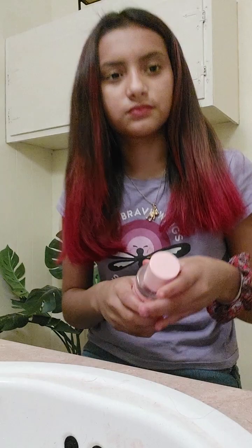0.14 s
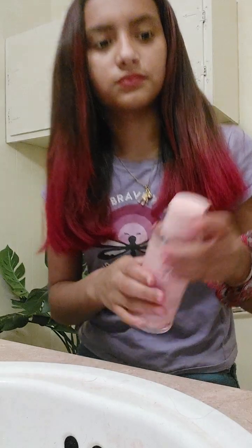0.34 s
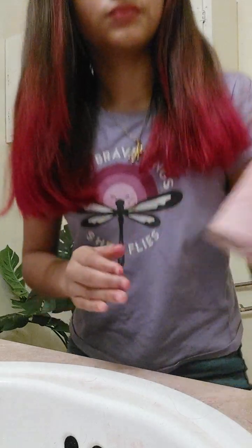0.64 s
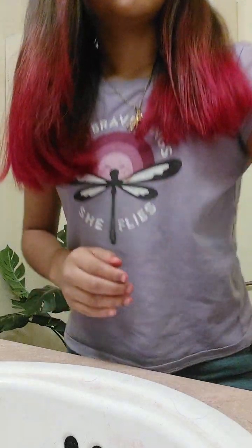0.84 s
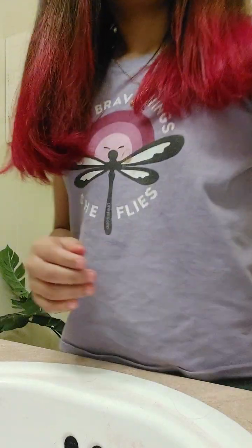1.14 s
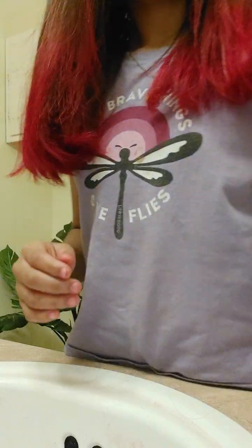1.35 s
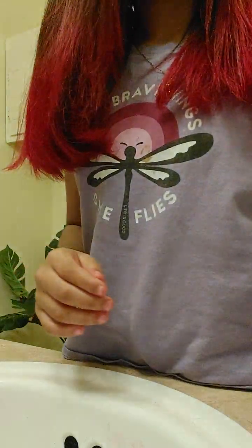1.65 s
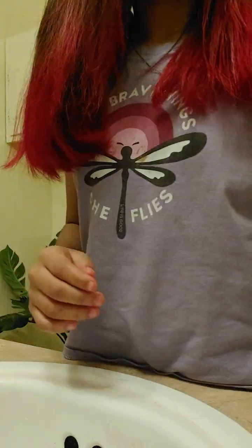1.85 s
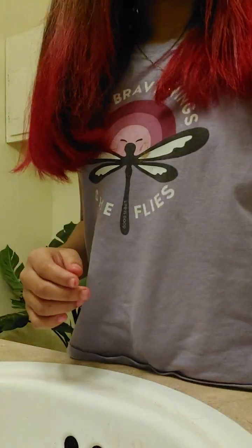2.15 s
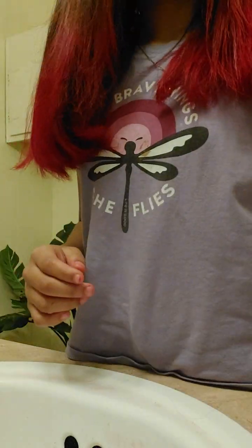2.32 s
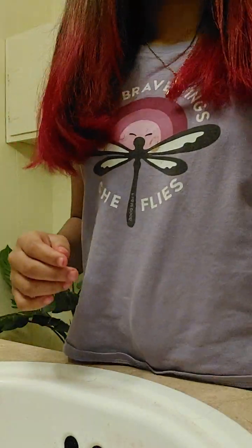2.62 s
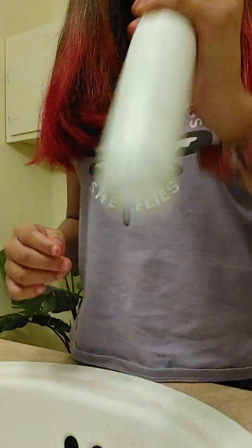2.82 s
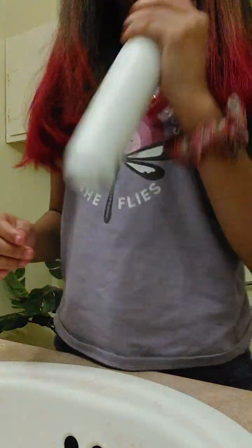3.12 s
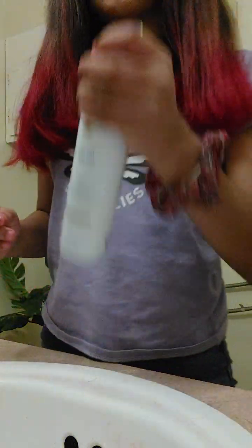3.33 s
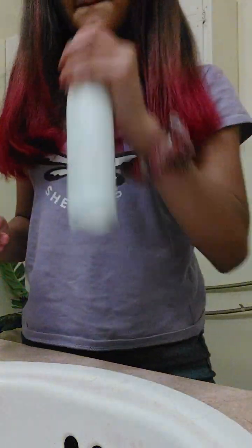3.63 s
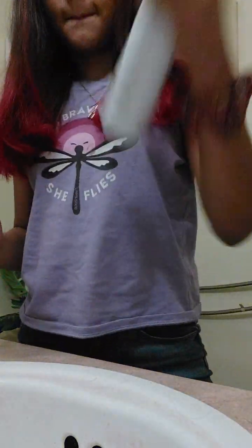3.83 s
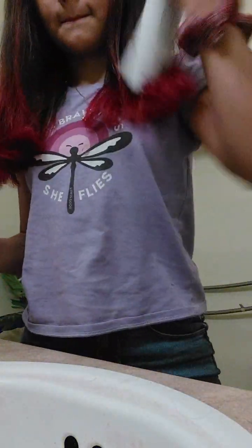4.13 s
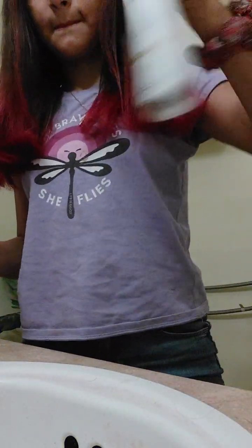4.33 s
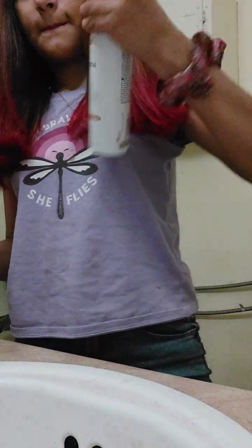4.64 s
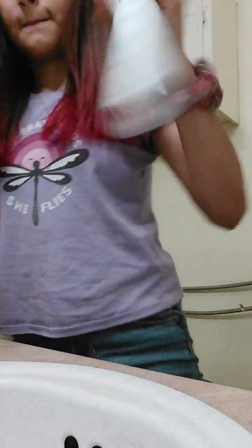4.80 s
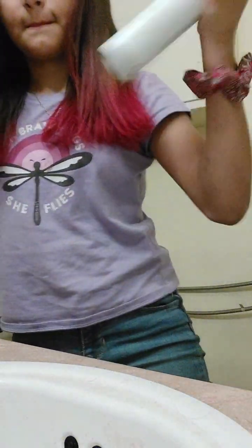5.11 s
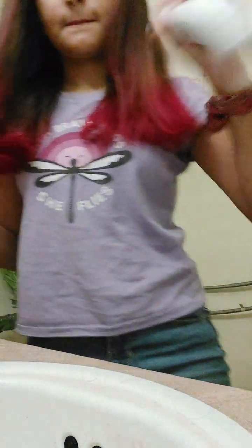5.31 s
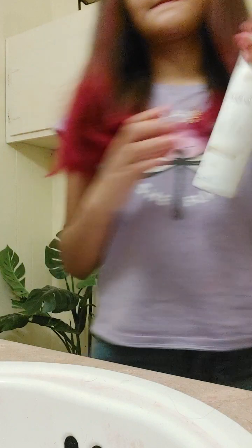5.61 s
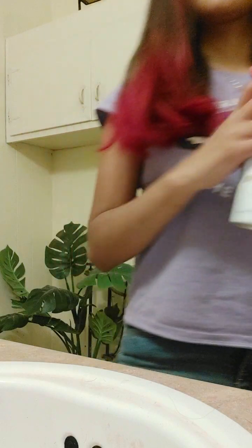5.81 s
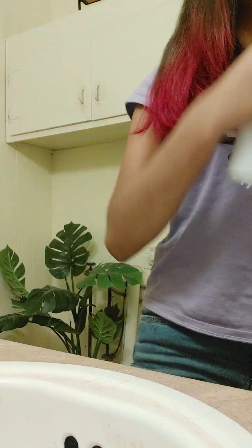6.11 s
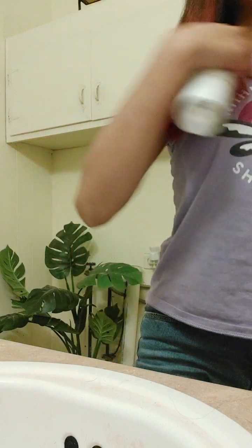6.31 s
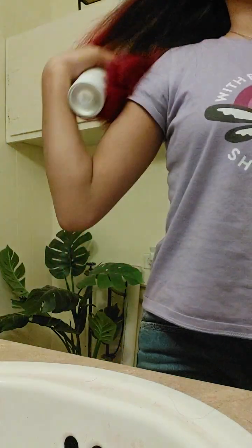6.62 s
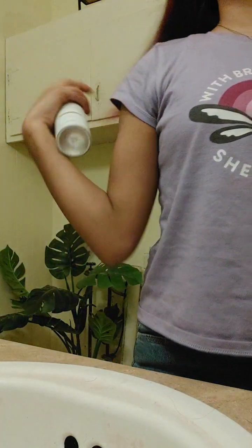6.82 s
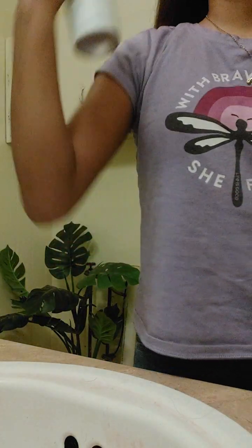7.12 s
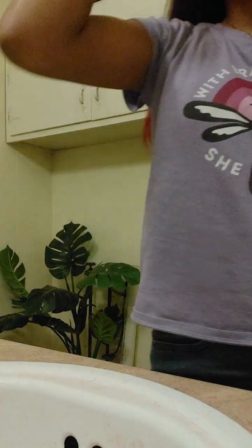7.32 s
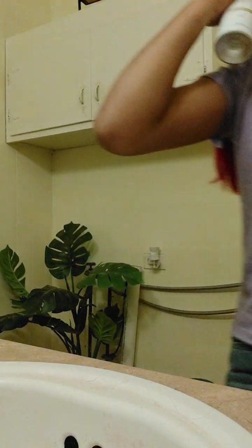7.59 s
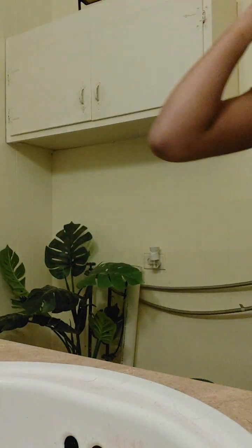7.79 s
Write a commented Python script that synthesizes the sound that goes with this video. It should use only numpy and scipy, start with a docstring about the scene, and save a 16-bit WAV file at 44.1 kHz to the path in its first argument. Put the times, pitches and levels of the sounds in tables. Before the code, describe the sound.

In a small hard bathroom, close to the microphone, faint handling and plastic ticks lead to two sharp knocks as a bottle is set on the counter. After a near pause, a metal can clatters and scrapes as it is picked up. Then quiet, uneven rubbing of hair, cloth and hand continues with airy hisses and occasional dull bumps.

```python
"""Knocks and a scrape lead: a plastic perfume bottle is set down on a bathroom counter near the
microphone and a metal spray can picked up; each is noisy clatter twice over, plus basin and can modes.
Hair, cloth and hand rub as the can is gripped and waved about (coloured slip noise), with soft hisses.
Plastic clicks are resonant ticks; bumps, dull to hard, boom in the cabinet and add low booms and tails
to some knocks and clicks. Decaying noise is the small hard room; faint steady noise is its quiet."""
import sys
import numpy as np
from scipy import signal
from scipy.fft import rfft, irfft, next_fast_len
from scipy.io import wavfile
from scipy.ndimage import uniform_filter1d

SR = 44100
rng = np.random.default_rng(int(sys.argv[2]) if len(sys.argv) > 2 else 0)


def transcribe(u):
    """Save the signal u as a 16-bit wav file named by the first command-line argument.

    u: samples, shape (n,) or (channels, n), limited to [-1, 1]; the rate is SR.
    q: integer samples, one column per channel.
    """
    v = np.clip(np.atleast_2d(u).T, -1, 1)
    q = np.round(v * 32767).astype(np.int16)
    wavfile.write(sys.argv[1], SR, q)


N = 350595
T_S = np.arange(SR * 3 // 4) / SR  # clock for short sounds

# rubbing strokes, hair, cloth, a hand gripping the can:
#   (start [s], length [s], rub level [dB], hiss re rub [dB])
STROKES = [(0.0, 0.0074, -69, -21.5), (0.054, 0.067, -62.5, -9), (0.321, 0.087, -59, -1.5),
           (0.468, 0.12, -68.5, -9), (0.626, 0.31, -63.5, 1), (1.59, 0.093, -62, -13.5),
           (1.893, .05, -74.5, -4.5), (2.36, 0.064, -49.5, -4), (2.671, 0.049, -53.5, 3.5),
           (2.823, 0.075, -57.5, 5.5), (3.032, .06, -67.5, 0), (3.122, 0.058, -57.5, 1.5),
           (3.334, 0.13, -57.5, -0.5), (3.503, 0.083, -67, -6), (3.646, 0.076, -61.5, -1),
           (3.754, .03, -68.5, 1), (3.902, .06, -69, 0), (3.98, 0.072, -60, -0.5), (4.185, 0.11, -56, -0.5),
           (4.314, 0.067, -54, 4), (4.38, 0.14, -58.5, -1), (4.537, 0.078, -59.5, 4.5),
           (4.622, 0.13, -58, -1), (4.792, 0.074, -60, 1), (4.887, 0.21, -57.5, 0), (5.191, 0.047, -60, 1),
           (5.279, 0.12, -58.5, 2), (5.463, 0.05, -55.5, 1.5), (5.53, 0.17, -59, -0.5),
           (5.716, 0.15, -62, -2), (5.82, 0.14, -55.5, 12), (5.899, 0.045, -47, 4.5),
           (6.027, .03, -58.5, -4), (6.123, 0.024, -55, -1), (6.26, 0.37, -63, 3), (6.655, 0.098, -74.5, 7),
           (6.83, 0.067, -69, 3), (6.956, .26, -72.5, -1), (7.546, .09, -68, -1), (7.7, .25, -80.5, 4.5)]
# rub spectrum: (frequency [Hz], density [dB per Hz])
RUB_SPECTRUM = [(150, -33), (250, -12), (279, -19.5), (351, -8), (567, -11.5), (1020, -19.5), (1500, -13.5),
                (1670, -10), (2340, -10), (4280, -7), (5230, -10.5), (7230, -8.5), (10000, -27.5),
                (13000, -53), (22000, -120)]
# hiss spectrum: (frequency [Hz], density [dB per Hz])
HISS_SPECTRUM = [(3000, -63.5), (8000, -3), (11000, -4), (15500, -1)]
# basin ring re rubbing: (time [s], level [dB])
BASIN_RING_LEVELS = [(0.1, -8.5), (.7, -14), (1.65, -0.5), (2.9, -10), (3.4, -21), (3.8, -2), (4.05, -6),
                     (4.35, -11.5), (4.55, -2), (5.6, -5.5), (5.92, -18), (6.4, -9), (7.2, -3.5),
                     (7.9, -6.5)]
# room quiet spectrum: (frequency [Hz], density [dB per Hz])
AIR_SPECTRUM = [(15, -42.5), (25, -8), (114, 0.5), (263, -16), (463, -6), (936, -23), (1330, -17),
                (1520, -9), (1790, -24), (6560, -24), (9070, -29.5), (14800, -24), (16000, -24)]
# bumps, dull to hard, with the low booms and tails of some knocks and clicks:
#   (time [s], level [dB], bass [dB], hardness at 2.5 kHz [dB], cabinet ring [dB], rise [s], t60 [s])
BUMPS = [(0.108, -44.5, -1.5, 0, -9, 0.0031, 0.17), (0.15, -74.5, 25, -15, -20, 0.0025, 1),
         (0.359, -58, 6.5, -16, -8, 0.033, 0.46), (0.641, -50.5, 19, 20, 15.5, 0.022, 0.45),
         (1.035, -70.5, 6, -11.5, 18, 0.013, 0.22), (1.214, -37.5, 3.5, 26, -2.5, 0.0047, 0.61),
         (1.401, -56.5, 21.5, 0, -17, .004, 0.21), (1.674, -48, 7.5, -2, -8, 0.0053, 0.13),
         (2.510, -49.5, 11, -4, 16, 0.0076, 0.16), (3.645, -61, -15, 2, 12.5, 0.01, 0.34),
         (5.547, -54.5, -2.5, 25, 6.5, 0.024, 0.74), (5.869, -66, 10, 3.5, 12, 0.015, 0.31),
         (6.219, -35.5, -8, 2, 1.5, 0.035, 0.66), (6.471, -50.5, 3, 2, 0, 0.0056, 0.7),
         (6.652, -53.5, 11, -13, 2, 0.0062, 0.7), (7.295, -55, 4, -20, -2, 0.00356, .08),
         (7.498, -38.5, 1, 3, -13, 0.019, 0.14)]
# bump thud spectrum: (frequency [Hz], density [dB per Hz])
THUD_SPECTRUM = [(60, -11), (200, -8), (400, 2.5), (700, -2.5), (1100, -3.5), (1600, -8.5), (2700, -22.5),
                 (5000, -29.5), (12000, -44)]
# bump boom spectrum: (frequency [Hz], density [dB per Hz])
BOOM_SPECTRUM = [(25, -24), (50, -1.5), (75, 1), (130, -2), (200, -10.5), (320, -18.5), (700, -35.5),
                 (2000, -73.5)]
# cabinet modes ringing freely: (frequency [Hz], level [dB], t60 [s])
CABINET_MODES = [(412, -4, .38), (438, -3, .45), (462, 0, .55), (478, -5, .45), (500, -7, .35),
                 (560, -9, .85), (598, -11, .7), (960, -16, .6), (1130, -17, .5)]
# light plastic clicks: (time [s], level [dB], pitch [Hz], ring [dB], t60 [s])
CLICKS = [(.1450, -51.5, 2950, 8, 0.013), (0.148, -46, 2230, -4, 0.19), (0.299, -69, 4600, 14, 0.11),
          (0.5752, -57, 5300, 3, 0.028), (1.2155, -36.5, 2040, 4.5, 0.051), (1.241, -38.5, 2010, 6, 0.012),
          (1.2538, -54, 2040, 6, 0.05), (1.275, -50, 1960, 18, 0.028), (3.145, -58, 4460, -14, 0.076),
          (4.559, -53, 1470, 3, 0.041), (4.802, -56, 4180, -17, 0.047), (6.087, -55.5, 5770, -1, 0.057)]
# click spectrum: (frequency [Hz], density [dB per Hz])
CLICK_SPECTRUM = [(100, -7.5), (450, 4), (800, -10.5), (1400, -5), (4500, 1.5), (7000, -8), (9500, -19),
                  (15000, -14)]
# blows and a scrape on the counter: (time [s], level [dB], bass [dB], hardness at 9 kHz [dB],
#   basin ring [dB], can ring [dB], favoured pitch [Hz], second-contact clatter t60 [s],
#   second contact re first [dB])
KNOCKS = [(1.2980, -17.5, -3.5, 2.5, 4.5, -1.5, 3300, 0.064, -4),
          (1.3971, -14.5, 5, -15.5, -7.5, -23, 3900, 0.03, -9),
          (1.66, -31.5, 0, -5, -3.5, -30, 6000, 0.06, -4.5),
          (1.871, -62.5, -1, 2.5, -5, -3, 5200, 0.16, -3), (2.076, -62, 16, -10, 5, -13.5, 3580, 0.48, 0.5),
          (2.1720, -31.5, -25.5, -3, 2.5, -4.5, 1900, 0.24, 0),
          (2.1932, -12.5, -13.5, -7, -2, -11, 3500, 0.059, -7.5),
          (2.263, -38.5, 4, -6, -5.5, -10, 1200, 0.24, -12.5),
          (2.2931, -26.5, -13, -7.5, -8.5, -14.5, 2000, 0.063, -15),
          (2.3260, -32, -9, -20.5, -15, -17, 2000, 0.047, -2.5),
          (2.345, -25.5, -15.5, -14.5, -3.5, -10, 3860, .13, -10.5),
          (2.4137, -18.5, -14, -2, -6, 1.5, 2800, 0.092, -3.5),
          (2.5180, -26, -21, 7, -1.5, 5.5, 2660, 0.086, -22),
          (2.531, -24.5, -2, 8, 3.5, 6, 2650, 0.18, -2.5),
          (2.586, -30, -8, -10, -7.5, -25, 2600, 0.025, -7),
          (2.6450, -44.5, -4, -1, 3.5, -8, 2600, .085, 2), (7.494, -67, 7, -39, 17, -19, 1087, .05, -6.5)]
# clatter spectrum: (frequency [Hz], density [dB per Hz])
CLATTER_SPECTRUM = [(40, -18.5), (90, -8.5), (250, -2.5), (450, -4.5), (700, -3), (900, -5.5), (1300, 1.5),
                    (2200, -7.5), (3500, -4), (6000, -5.5), (9000, -19), (15000, -19.5)]
# counter and basin modes: (frequency [Hz], level [dB], t60 [s])
BASIN_MODES = [(406.7, -16, 0.3), (393, -10, 0.099), (460.3, -2, 0.12), (575, -11, 0.082), (672, -11, 0.1),
               (1182, -12.5, 0.13), (1388, -8.5, 0.11), (1457, -1, .05), (1495, 4, .11)]
# metal can modes: (frequency [Hz], level [dB], t60 [s])
CAN_MODES = [(1118.6, -7, .05), (1876, -7.5, .09), (2090, -11, 0.15), (2610, -3.5, 0.032),
             (2660, -3, 0.075), (2950, -13.5, .09), (3047, -11, 0.019), (3285, -3, .07), (3473, -2.5, .08),
             (3840, -0.5, 0.05), (3932, -9, 0.15), (4320, -11, 0.19), (4480, -8.5, 0.094),
             (4670, -3.5, 0.062), (4980, -9, 0.061), (5680, -6.5, .08), (5780, -11, 0.029), (6400, -8, .08),
             (6910, -13.5, 0.11), (7580, -10.5, 0.088)]
# room decay: (frequency [Hz], t60 [s])
ROOM_DECAY = [(100, 0.22), (500, 0.27), (1500, 0.22), (4000, 0.23), (8000, 0.19), (15000, 0.3)]
# room colour: (frequency [Hz], gain [dB])
ROOM_COLOUR = [(60, 1), (300, 0.5), (460, 2.5), (850, 3), (1300, -2.5), (1500, -0.5), (1750, 2.5),
               (4500, 0), (9000, 2), (15000, -1.5)]
# left microphone port: (frequency [Hz], gain [dB])
LEFT_PORT = [(300, 4.5), (620, 0), (850, -4), (1100, -0.5), (1500, -2.5), (1900, -1.5), (2350, -3),
             (3000, 0), (6000, -1.5), (7800, 5), (9200, -1), (12000, 4), (15500, -4.5)]
# right microphone port: (frequency [Hz], gain [dB])
RIGHT_PORT = [(300, 4), (700, 3.5), (1000, -1), (1350, 1), (1510, 1.5), (1700, 0), (4000, 1), (7200, 0.5),
              (8600, -18.5), (10500, -0.5), (13500, 2), (15200, 3)]


def amp(db):
    """Decibels to gain."""
    return 10 ** (np.asarray(db) / 20)


def unit(x):
    """Scales to an rms of one."""
    return x / np.sqrt(np.mean(x ** 2) + 1e-20)


def blow(x):
    """Scales a short sound to the energy of 10 ms at an rms of one."""
    return x / np.sqrt(np.mean(x ** 2) * x.shape[-1] / (SR / 100) + 1e-20)


def read(points, hz):
    """Joins points by straight lines over log frequency."""
    f_hz, value = np.transpose(points)
    return np.interp(np.log(hz + 1), np.log(f_hz + 1), value)


def add(mix, time_s, sound):
    """Mixes a sound in at time_s."""
    part = mix[:, max(round(time_s * SR), 0):][:, :sound.shape[-1]]
    part += sound[..., :part.shape[1]]


def colour(x, points, size=4096):
    """Minimum-phase filter with the given spectrum; attacks stay sharp."""
    hz = abs(np.fft.fftfreq(size, 1 / SR))
    log_gain = np.log(amp(read(points, hz)))
    spectrum = np.exp(np.conj(signal.hilbert(log_gain)))
    taps = np.fft.ifft(spectrum).real[:size // 2]
    return signal.fftconvolve(x, taps[None], axes=1)[:, :x.shape[1]]


def noise(length, same):
    """White noise at two ports; same is the shared part of the power."""
    z = rng.standard_normal((3, length))
    return np.sqrt(same) * z[0] + np.sqrt(1 - same) * z[1:]


def resonate(x, hz, width_hz):
    """One resonance of peak gain one."""
    return signal.lfilter(*signal.iirpeak(hz, hz / width_hz, SR), x)


def ring(modes, t_s, scatter_db):
    """Dying modes; each call reweights, flips and slightly detunes them."""
    total = 0
    for hz, db, t60_s in modes:
        gain = amp(db + scatter_db * rng.standard_normal()) * rng.choice([-1, 1])
        tuned_hz = hz * (1 + .004 * rng.standard_normal())
        total = total + gain * amp(-60 * t_s / t60_s) * np.sin(2 * np.pi * tuned_hz * t_s)
    return blow(total)


def late(x, lag_s):
    """Delays the left port by lag_s (advances it, if negative)."""
    size = 2 * next_fast_len(N // 2 + 1)
    delay = np.exp(-2j * np.pi * np.fft.rfftfreq(size, 1 / SR) * lag_s)
    return np.array([irfft(rfft(x[0], size) * delay)[:N], x[1]])


def air(level_db=-69.5):
    """The quiet of the room: steady coloured noise."""
    return amp(level_db) * unit(colour(noise(N, same=0.2), AIR_SPECTRUM))


def patchy(x, depth_db, bins=7, frames=5):
    """The colour drifts in time-frequency patches as the rubbing surfaces shift."""
    z = signal.stft(x, SR, nperseg=512)[2]
    patches = uniform_filter1d(rng.standard_normal(z.shape[1:]), bins, 0)
    patches = unit(uniform_filter1d(patches, frames, 1))
    return unit(signal.istft(z * amp(depth_db * patches), SR, nperseg=512)[1][:, :N])


def slipping(grains_per_s=900, grain_db=-7):
    """Friction: tiny slips as noise plus sparse larger ones, left port first."""
    size_db = 3 * np.minimum(rng.exponential(1, N), 3)
    grains = (rng.random(N) < grains_per_s / SR) * amp(size_db)
    slips = noise(N, same=0.13) + amp(grain_db) * unit(grains * noise(N, same=0.24))
    return late(patchy(slips, depth_db=2.5), lag_s=-.00023)


def stroke(t_s, start_s, length_s, swell_share=0.45, release_t60_s=0.45):
    """A stroke swells over a share of its length, holds, then dies."""
    swell = np.clip((t_s - start_s) / (swell_share * length_s), 0, 1)
    return swell * amp(-60 * np.maximum(t_s - start_s - length_s, 0) / release_t60_s)


def rustle(cloth_db=-9, waver_db=2.04, waver_s=0.031):
    """Hair, cloth and hand rub under uneven pressure; the basin rings along, and strokes hiss."""
    t_s, slips = np.arange(N) / SR, slipping()
    body = unit(colour(slips, RUB_SPECTRUM)) + amp(cloth_db) * unit(resonate(slips, 4200, 738.6))
    hiss = unit(colour(slips, HISS_SPECTRUM))
    basin = unit(resonate(resonate(slips, 1515, 50.1), 1515, 985))
    basin_gain = amp(np.interp(t_s, *np.transpose(BASIN_RING_LEVELS)))

    # stroke powers add, on a coarse clock
    slow_s = t_s[::SR // 1000]
    _, _, rub_db, hiss_db = np.transpose(STROKES)
    power = np.array([stroke(slow_s, start_s, length_s) for start_s, length_s, _, _ in STROKES]) ** 2
    rubbing = np.interp(t_s, slow_s, np.sqrt(amp(rub_db) ** 2 @ power))
    hissing = np.interp(t_s, slow_s, np.sqrt(amp(rub_db + hiss_db) ** 2 @ power))

    knots_s = np.arange(0, t_s[-1], waver_s)
    pressure = amp(waver_db * np.interp(t_s, knots_s, rng.standard_normal(len(knots_s))))
    out = rubbing * (body + basin_gain * basin) + hissing * hiss
    return pressure * out * amp([[-.4], [.4]])


def bumps(full_ring_s=0.51):
    """Bumps, dull to hard, and booms and tails of some knocks and clicks: thud, boom, cabinet ring."""
    out = np.zeros((2, N))
    for time_s, db, bass_db, hard_db, ring_db, rise_s, t60_s in BUMPS:
        # at t60 = full_ring_s the cabinet rings freely; other t60s scale its decay in proportion
        stretch = t60_s / full_ring_s
        t_s = T_S[:round(SR * np.clip(1.1 * max(stretch, t60_s), .25, .75))]
        onset = np.minimum(t_s / rise_s, 1)
        push = onset * amp(-60 * np.maximum(t_s - rise_s, 0) / t60_s)

        thud = blow(colour(push * noise(len(t_s), same=0.88), THUD_SPECTRUM))
        thud = colour(thud, [(800, 0.011), (2500, hard_db), (6000, 0)])
        boom = blow(colour(push * noise(len(t_s), same=1.0), BOOM_SPECTRUM))
        modes = [(hz, mode_db, stretch * decay_s) for hz, mode_db, decay_s in CABINET_MODES]
        hollow = blow(onset * ring(modes, t_s, scatter_db=0.94))
        add(out, time_s, amp(db) * (thud + amp(bass_db) * boom + amp(ring_db) * hollow))
    return late(out, lag_s=-0.00026)


def clicks(contact_db=-11.5):
    """Plastic ticks: a noise burst and impulse through one hollow, quickly damped resonance."""
    out = np.zeros((2, N))
    contact = amp(contact_db) * blow(1. * (T_S == 0))
    for time_s, db, hz, ring_db, t60_s in CLICKS:
        force = blow(noise(len(T_S), same=0.39) * amp(-60 * T_S / t60_s)) + contact
        hollow = blow(resonate(force, hz, hz / 20))
        add(out, time_s, amp(db) * (blow(colour(force, CLICK_SPECTRUM)) + amp(ring_db) * hollow))
    return out * amp([[-2], [1.2]])


def knock_contact(t_s, modes, bass_db, hard_db, basin_db, can_db, t60_s, contact_db=-6):
    """Impulse and clatter drive the can modes; the basin rings beside them."""
    fade = amp(-60 * t_s / t60_s)
    force = blow(noise(len(t_s), same=.5) * fade) + amp(contact_db) * blow(1. * (t_s == 0))
    clatter = blow(colour(force, CLATTER_SPECTRUM))
    clatter = colour(clatter, [(220, bass_db), (500, 0.0038), (3000, 0), (9000, hard_db)])
    can_ring = ring(modes, t_s, scatter_db=0.85)
    can = blow(signal.fftconvolve(force * fade, can_ring[None], axes=1)[:, :len(t_s)])
    basin = ring(BASIN_MODES, t_s, scatter_db=0.89)
    return clatter + amp(basin_db) * basin + amp(can_db) * can


def knocks(spot_db=8, spot_width=.16, rock_s=0.0055, first_share=.6):
    """Blows and a scrape, two contacts each: a base lands on its edge and rocks flat rock_s later."""
    out, t_s = np.zeros((2, N)), T_S[:SR // 4]
    for time_s, db, bass_db, hard_db, basin_db, can_db, spot_hz, t60_s, second_db in KNOCKS:
        # the spot touched brings out can modes near one pitch
        modes = []
        for hz, mode_db, decay_s in CAN_MODES:
            boost_db = spot_db * np.exp(-(np.log(hz / spot_hz) / spot_width) ** 2)
            modes.append((hz, mode_db + boost_db, decay_s))
        edge = knock_contact(t_s, modes, bass_db, hard_db, basin_db, can_db, first_share * t60_s)
        # second contact: harder, less basin, more can
        flat = knock_contact(t_s, modes, bass_db, hard_db + 3, basin_db - 5.5, can_db + 2.5, t60_s)
        add(out, time_s, amp(db) * edge)
        add(out, time_s + rock_s, amp(db + second_db) * flat)
    return late(out, lag_s=.00011) * amp([[-2.2], [1.2]])


def room(x, gap_s=0.01):
    """Dense reflections from near walls, each band dying at its own speed."""
    hz, t_s, z = signal.stft(noise(len(T_S), same=0.077), SR, nperseg=256)
    decay = amp(-60 * t_s / read(ROOM_DECAY, hz)[:, None])
    tail = signal.istft(z * decay, SR, nperseg=256)[1][:, :len(T_S)]
    tail = tail * np.clip(T_S / gap_s - 1, 0, 1)  # silent for gap_s, then fades in over gap_s
    tail = colour(tail / np.linalg.norm(tail[0]), ROOM_COLOUR)
    return signal.fftconvolve(x, tail, axes=1)[:, :N]


def scene():
    """Near knocks are fairly dry; clicks and bumps carry more of the room."""
    quiet, rubbing = air(), rustle()
    bumping, light, near = bumps(), clicks(), knocks()
    echo = room(amp(-9.5) * near + amp(-3) * light + amp(-2.5) * bumping)
    return near + light + bumping + echo + rubbing + quiet


def record(dry, mono_hz=450, rumble_hz=42, edge_hz=16100):
    """Long waves reach the ports more alike; port colours, soft saturation and band limits follow."""
    lowpass = signal.butter(1, mono_hz, fs=SR, output="sos")
    long_side = signal.sosfiltfilt(lowpass, (dry[0] - dry[1]) / 2)
    ports = dry + 0.47 * np.array([-long_side, long_side])
    heard = np.vstack([colour(ports[:1], LEFT_PORT), colour(ports[1:], RIGHT_PORT)])
    heard = signal.sosfilt(signal.butter(2, rumble_hz, "high", fs=SR, output="sos"), heard)
    band_limit = signal.firwin(401, edge_hz, window=("kaiser", 9), fs=SR)
    return signal.oaconvolve(np.tanh(heard), band_limit[None], "same")


dry = scene()
out = record(dry)
transcribe(out)
```